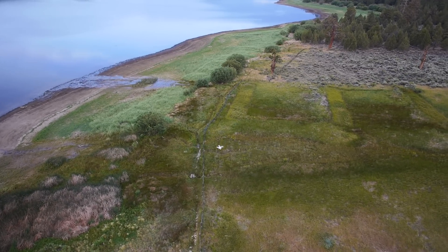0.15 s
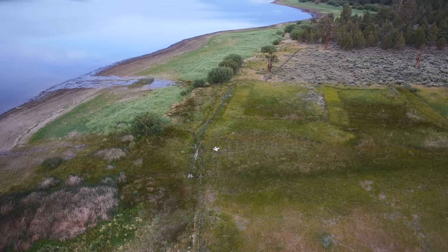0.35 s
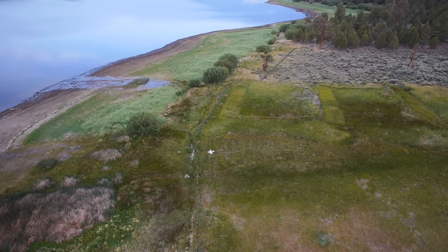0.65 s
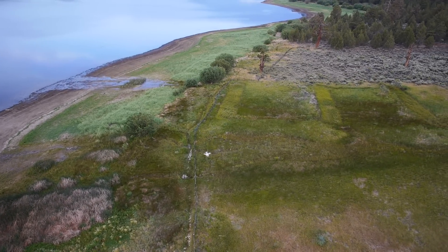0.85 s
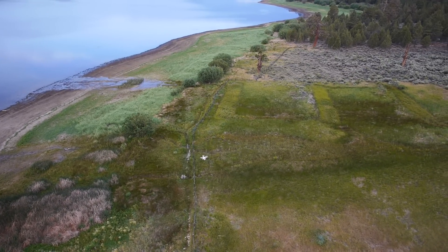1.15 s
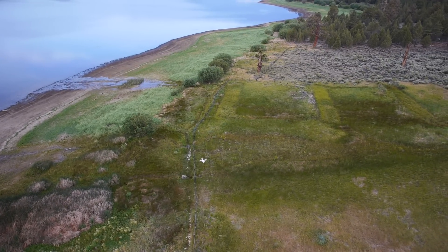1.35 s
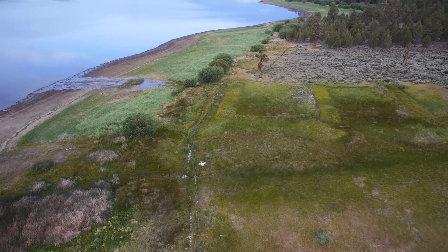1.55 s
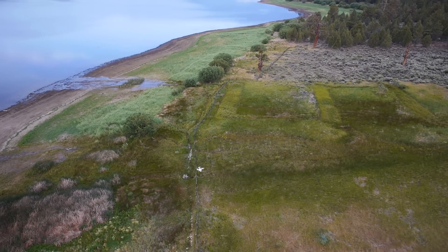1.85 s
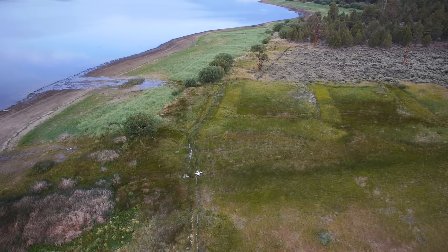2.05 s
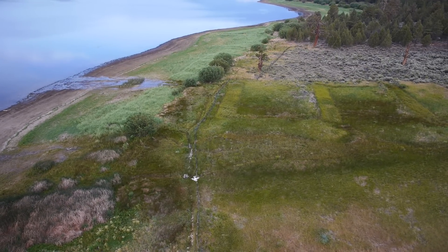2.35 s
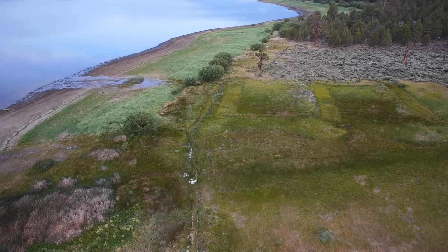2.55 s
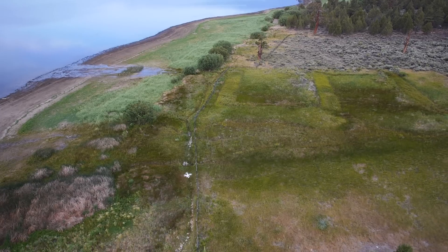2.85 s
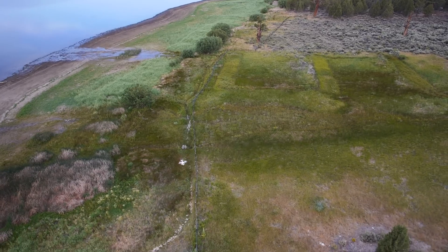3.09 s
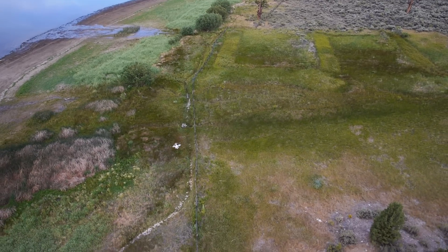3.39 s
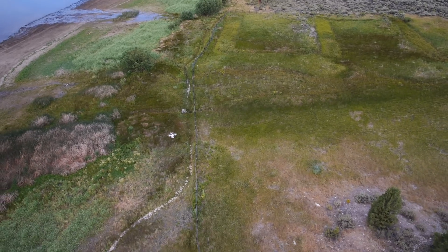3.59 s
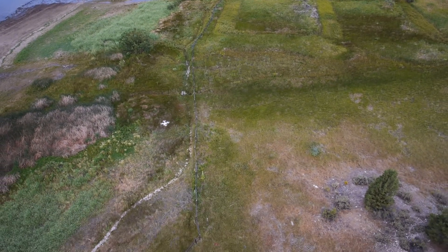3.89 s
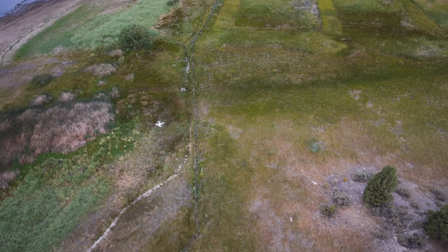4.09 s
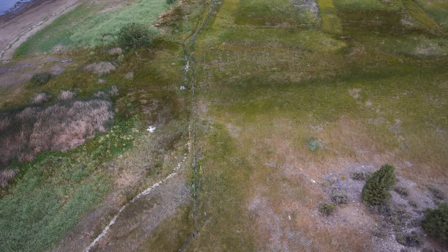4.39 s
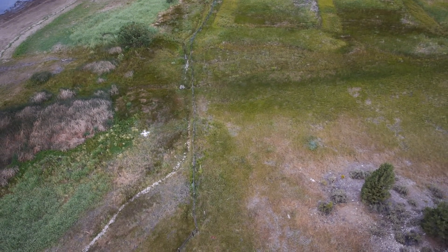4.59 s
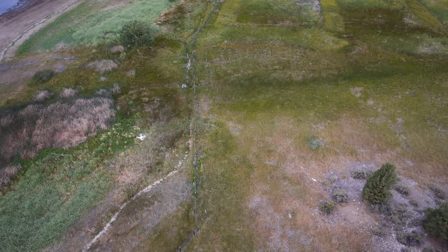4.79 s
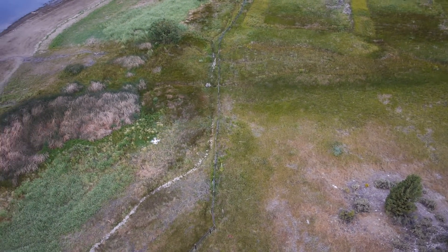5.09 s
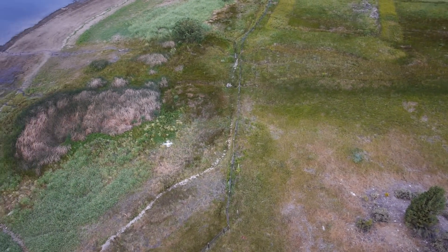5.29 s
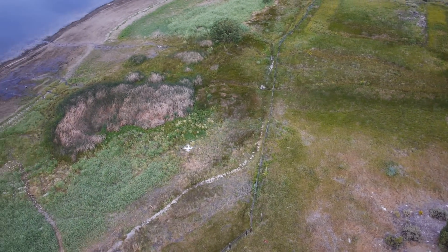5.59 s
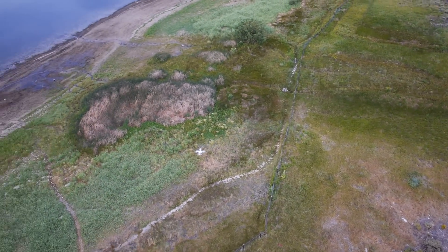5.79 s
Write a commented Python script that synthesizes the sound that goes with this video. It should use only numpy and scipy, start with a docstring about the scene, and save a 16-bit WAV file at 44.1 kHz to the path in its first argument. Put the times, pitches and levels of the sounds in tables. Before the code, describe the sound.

A multirotor drone flies outdoors, its propellers giving a steady buzzing hum that beats against itself, with airy hiss and a thin high motor whine.

```python
"""A buzzing blade hum that beats against itself: a multirotor drone in flight, heard from its own camera.
Two near propellers give each blade a thump, a slap and a spit of hiss; six far ones hum, duller.
All eight are two-bladed and drift in speed; a turn spreads the speeds apart briefly.
Behind them: a singing fourth order, shifting hiss bands, motor switching tones, rush of downwash."""
import sys
import numpy as np
from scipy import signal
from scipy.fft import rfft, irfft, next_fast_len
from scipy.io import wavfile
from scipy.ndimage import map_coordinates

SR = 44100
rng = np.random.default_rng(int(sys.argv[2]) if len(sys.argv) > 2 else 0)


def pcm_store(signal):
    """Save signal as 16-bit PCM."""
    levels = np.round(np.clip(np.atleast_2d(signal), -1, 1) * 32767)
    wavfile.write(sys.argv[1], SR, levels.astype(np.int16).T)


N = 261947

# near pair, blade rates before steering, one curve a propeller: [t/s, f/Hz]
NEAR_RATES = [
    [(0, 183.2), (.55, 181), (.75, 181.6), (.95, 185.8), (1.55, 184.4), (2.1, 187), (2.5, 189.8),
     (3.2, 190.5), (3.55, 189.4), (3.85, 189.7), (4.08, 188.3), (4.25, 190), (4.66, 189), (5.27, 187.9),
     (5.94, 186.8)],
    [(0, 190.2), (.35, 190.6), (.65, 192.2), (1.05, 188.6), (1.3, 191.3), (1.5, 190.4), (1.93, 192.7),
     (2.1, 189.2), (2.35, 189.2), (2.55, 190.5), (3.3, 190), (3.8, 188.4), (4.2, 190), (4.66, 187.4),
     (5.27, 187.2), (5.94, 187.2)],
]
# head start of each near propeller: [blades]
NEAR_LEAD_BLADES = (0, .58)
# three faster far propellers, blade rates before steering: [t/s, f/Hz]
FAST_RATES = [
    [(0, 201.3), (.55, 199.6), (1.2, 203.7), (1.5, 201), (1.85, 203), (2.2, 200.5), (2.52, 203.5),
     (2.85, 201.5), (3.45, 201), (4.05, 197.6), (4.66, 197.4), (5.27, 199)],
    [(0, 200), (2, 198.5), (3, 196.6), (3.6, 196.3), (3.95, 195), (4.66, 196.3), (5.27, 195.3), (5.94, 197)],
    [(0, 190), (.75, 191), (1.1, 193.2), (1.5, 192), (2.5, 194.6), (3.6, 191.3), (4.5, 190.3), (5.27, 192),
     (5.94, 191.3)],
]
# three slower far propellers, blade rates before steering: [t/s, f/Hz]
SLOW_RATES = [
    [(0, 182.3), (.8, 182), (1.1, 179.2), (1.3, 182.7), (1.85, 183), (2.2, 184.5), (2.45, 184),
     (3.05, 186.8), (4, 186), (4.3, 188), (4.66, 186.7)],
    [(0, 182.5), (.3, 183.7), (.7, 180), (1.1, 183), (2, 186), (2.5, 188.5), (3.1, 190), (3.9, 188.5),
     (4.66, 189.5), (5.27, 187)],
    [(0, 183.5), (.6, 183), (1.4, 184), (2, 186.3), (2.4, 189), (3, 190.3), (3.8, 188.8), (4.3, 189),
     (5.94, 187)],
]
# steering, a turn then its overshoot; speeds four propellers up, slows four: [t/s, blade rate shift/Hz]
STEERING = [(4.3, 0), (4.5, 6.5), (4.66, 9), (4.82, 7), (5.05, 2), (5.27, 0), (5.48, 2.8), (5.65, -1),
            (5.8, -3.8), (5.94, -3.3)]
# way of spin: steering speeds the propeller up (1) or slows it (-1)
NEAR_SPIN, FAST_SPIN, SLOW_SPIN = (1, -1), (1, -1, 1), (-1, -1, 1)
# motor hunting round the set speed: scale of lead or lag, random knots per second
NEAR_HUNT_BLADES, FAR_HUNT_BLADES, HUNT_KNOTS_PER_S = .008, .022, 7

# unsteadiness of the air entering the propellers: [t/s, level/dB]
TURBULENCE = [(0, 0.5), (1, 2.5), (2.3, 0.5), (3, 2.5), (3.8, 4), (4.3, 0.5), (4.7, 0), (5.2, 1),
              (5.94, -2)]
# gain on the near thump and the far propellers: [t/s, level/dB]
HUM = [(0, 1.5), (2.2, 1.9), (3.2, -0.5), (3.75, -4), (4.3, -3), (5.2, -1.5), (5.94, -0.5)]
# level of the blade slaps: [t/s, level/dB]
SLAP_LEVEL = [(0, -30.5), (1.3, -29.5), (2.3, -29.5), (2.65, -26.7), (3.4, -27.5), (3.9, -29), (4.3, -27.5),
              (4.6, -28.5), (5.05, -29.5), (5.28, -28.5), (5.94, -29.5)]
# level of the swish of the wake: [t/s, level/dB]
SWISH_LEVEL = [(0, -29), (.4, -27.8), (1.4, -29.5), (1.9, -28.3), (2.4, -31), (3, -35), (3.7, -39.5),
               (4.3, -40), (4.5, -34), (5.2, -34.5), (5.94, -32.5)]
# level of the tips' hiss: [t/s, level/dB]
HISS_LEVEL = [(0, -33), (2.5, -32.5), (3.3, -33), (4.2, -34), (4.6, -34), (5.94, -35.5)]
# level of the tips' finest fizz: [t/s, level/dB]
FIZZ_LEVEL = [(0, -42), (1.85, -43.5), (1.97, -41), (2.62, -41.5), (2.78, -42), (3.5, -39.5), (4.05, -39),
              (4.48, -37), (4.65, -41.5), (4.85, -38), (5.03, -43.5), (5.42, -39.5), (5.7, -41.5),
              (5.94, -42)]
# level of the singing fourth order: [t/s, level/dB]
TONE_LEVEL = [(0, -44), (2.1, -46), (2.5, -39.5), (3, -38.5), (3.5, -40.5), (3.85, -43), (4.12, -36),
              (4.35, -36), (4.6, -47), (4.95, -42), (5.25, -34), (5.55, -38.5), (5.94, -37.5)]
# bands of blade hiss: [centre f/Hz, width/Hz, level curve [t/s, level/dB]]
HISS_BANDS = [ (3800, 1100, [(0, -44), (2.2, -46), (2.7, -34), (3.7, -36), (4.3, -43), (4.6, -36.5),
              (5.94, -36.5)]), (10000, 970, [(0, -52), (3, -48), (3.7, -50), (4.9, -49), (5.25, -42),
              (5.94, -45)]), (11300, 1800, [(0, -57), (2.6, -44), (3.3, -48.5), (3.7, -40), (4.52, -44),
              (4.65, -54), (5.94, -52)])]

# spectrum of the near thump: [f/Hz, level/dB]
THUMP = [(60, -32.5), (130, 2), (190, 8.5), (260, 9.5), (380, 8), (570, 10), (760, 7.5), (950, 8),
         (1200, -9.5), (2000, -16), (9000, -56)]
# spectrum of the near slap: [f/Hz, level/dB]
SLAP = [(400, -26.5), (800, -5), (1100, -2.5), (1400, -2), (1750, 1.5), (2150, 4.5), (2600, 1.5),
        (3050, 2.5), (3450, 1.5), (3800, 3.5), (4180, 4.5), (4400, -4.5), (5100, -1.5), (5500, -2),
        (5750, -5), (6500, -10.5), (9000, -26), (15000, -45)]
# spectrum of the wake swish: [f/Hz, level/dB]
SWISH = [(60, -38), (200, -35), (400, -10.5), (800, -15), (1300, -1.5), (1800, -4.5), (2400, 1.5),
         (3050, 5), (3450, -8), (3750, -6), (4120, -0.5), (4400, -5), (4850, 0), (5500, -17.5), (6500, -22),
         (9000, -11), (15000, -41)]
# spectrum of the tip hiss: [f/Hz, level/dB]
HISS = [(1000, -21), (2500, 1.5), (4500, 11.5), (6000, 8), (7500, 2.5), (9500, -7), (12000, -34),
        (16000, -23)]
# spectrum of the tip fizz: [f/Hz, level/dB]
FIZZ = [(6000, -30), (8500, -9), (10300, -0.5), (12000, 0), (13000, -1.5), (14000, -4), (15700, -14)]
# spectrum of the faster far propellers: [f/Hz, level/dB]
HUM_FAST = [(90, -22.5), (200, 4.5), (400, -3.5), (600, -5), (800, 0.5), (1000, -0.5), (1300, 0.5),
            (2000, -0.5), (3000, -4), (4100, -8), (5000, -15.5), (9000, -26.5)]
# spectrum of the slower far propellers: [f/Hz, level/dB]
HUM_SLOW = [(90, -28.5), (185, 1), (370, 2.5), (550, 4), (740, 4), (950, 1), (1300, 1.5), (1700, -0.5),
            (3000, -2.5), (5000, -24), (9000, -34.5)]
# spectrum of the downwash: [f/Hz, level/dB]
AIR = [(20, -18), (60, -23), (110, -12.5), (170, -1), (300, 2), (600, 8), (2000, 8), (6000, -17),
       (15000, -26)]
# motor switching tones round SWITCH_HZ: [offset/multiples of blade rate, level/dB rms before wobble]
SIDEBANDS = [(-1, -63), (0, -62), (2, -61), (3, -63), (4, -57), (5, -58.5), (6, -56), (7, -58.5),
             (9, -57.5), (10, -57), (11, -61), (12, -62), (13, -63)]
SWITCH_HZ = 8041

# levels before the HUM gain: near thump, each far propeller
THUMP_DB, FAST_DB, SLOW_DB = -38.5, (-39.5, -46, -38.5), (-37.5, -40.5, -38.5)
# second near propeller relative to the first
SECOND_THUMP_DB, SECOND_SLAP_DB, SECOND_HISS_DB = -2.5, -4.5, -12
# difference between the two blades of a propeller, plus or minus, as a share of pulse size
THUMP_IMBALANCE, SLAP_IMBALANCE, FAR_IMBALANCE = 0.095, 0.081, 0.098
SWAY_BLADES = .0085  # timing shift of the slaps by eddies, before turbulence
TIP_WIDTH_PERIODS = .04  # Gaussian sigma of a tip's spit, in blade periods
# shell: extra delay of the treble, spacing of resonances, their delay ripple
SHELL_SPREAD_S, SHELL_SPACING_HZ, SHELL_LINGER_S = 0.00046, 1400, .0005
# brief level dip of all propeller sound; half width at 1/e of the depth in dB
DIP_S, DIP_WIDTH_S, DIP_DB = 4.5, 0.027, -2
# camera response: notch centres, half width, band limit
NOTCHES_HZ, NOTCH_HALF_WIDTH_HZ, TOP_HZ = (3980, 4640, 5530), 20, 15780


def amp(db):
    """Decibels to gain."""
    return 10 ** (np.asarray(db) / 20)


def unit(x):
    """Scale to rms 1."""
    return x / np.sqrt(np.mean(x ** 2) + 1e-20)


def curves(rows):
    """Interpolate each column after the time to one value per sample."""
    time_s, *columns = np.transpose(rows)
    return [np.interp(np.arange(N) / SR, time_s, column) for column in columns]


def gain_curve(rows):
    """Gain per sample from a [t/s, level/dB] table."""
    return amp(curves(rows)[0])


def wobble(knots_per_s):
    """Smooth random curve: a spline through normal random knots."""
    knots = rng.standard_normal(int(N * knots_per_s / SR) + 4)
    return map_coordinates(knots, [np.arange(N) * knots_per_s / SR])


def coloured(x, spectrum, size=4096):
    """Minimum-phase filter through the spectrum's points, output at rms 1."""
    hz, db = np.transpose(spectrum)
    log_bins = np.log(np.fft.rfftfreq(size, 1 / SR) + 1)
    gain = amp(np.interp(log_bins, np.log(hz), db))
    # folding the cepstrum onto positive time makes the filter causal
    cepstrum = irfft(np.log(gain))
    cepstrum[1:size // 2] *= 2
    cepstrum[size // 2 + 1:] = 0
    impulse_response = irfft(np.exp(rfft(cepstrum)))
    return unit(signal.fftconvolve(x - x.mean(), impulse_response)[:N])


def dispersed(x):
    """The shell smears a pulse: treble arrives later than bass, and resonances linger."""
    m = next_fast_len(N + SR // 2)
    hz = np.fft.rfftfreq(m, 1 / SR)
    delay_s = SHELL_SPREAD_S * np.tanh(hz / 3500)
    delay_s = delay_s + SHELL_LINGER_S * np.cos(2 * np.pi * hz / SHELL_SPACING_HZ)
    # phase is the integral of group delay over frequency
    phase = 2 * np.pi * np.cumsum(delay_s) * hz[1]
    return irfft(rfft(x, m) * np.exp(-1j * phase), m)[:N]


def resonance(x, centre_hz, width_hz):
    """One resonance applied twice for steep flanks, output at rms 1."""
    b, a = signal.iirpeak(min(centre_hz, .45 * SR), centre_hz / width_hz, SR)
    once = signal.lfilter(b, a, x)
    return unit(signal.lfilter(b, a, once))


def blade_count(rates, spin, lead_blades, hunt_blades):
    """Blades gone by at each sample: own rate plus or minus steering, integrated, with hunting."""
    rate_hz = curves(rates)[0] + spin * curves(STEERING)[0]
    return np.cumsum(rate_hz) / SR + lead_blades + hunt_blades * wobble(HUNT_KNOTS_PER_S)


def slaps(passes, stir, scatter_db, jitter_s, imbalance):
    """One suction pulse a blade; the two blades differ, eddies scatter size and timing."""
    blade = np.arange(1, int(passes[-1]))
    at = np.interp(blade, passes, np.arange(N))
    size_chance, time_chance = rng.standard_normal((len(blade), 2)).T * stir[at.astype(int)]
    size = amp(scatter_db * size_chance) * (1 + imbalance * (-1) ** blade)
    at = np.clip(at + jitter_s * SR * time_chance, 0, N - 2)
    # split each pulse over two samples to keep its fractional time
    whole, part = at.astype(int), at % 1
    first = np.bincount(whole, size * (1 - part), N)
    second = np.bincount(whole + 1, size * part, N)
    return -first - second


def spits(passes, early, width, between):
    """Noise flaring as each blade sweeps by; early and width in blade periods, between a gain floor."""
    offset = (passes + early + .5) % 1 - .5
    flare = np.exp(-.5 * (offset / width) ** 2)
    return (flare + between) * rng.standard_normal(N)


def near_thump(pair, stir):
    """Soft low pressure pulse of each blade, wandering in time and level with turbulence."""
    total = np.zeros(N)
    beats = [passes + .09 + .02 * stir * wobble(12) for passes in pair]
    for passes, db in zip(beats, (0, SECOND_THUMP_DB)):
        pulses = slaps(passes, stir, scatter_db=0.48, jitter_s=.000015, imbalance=THUMP_IMBALANCE)
        total += pulses * amp(db + 1.3 * stir * wobble(14))
    return coloured(total, THUMP)


def near_slap(pair, stir):
    """Sharp pulse of each blade; eddies lasting several blades widen the high harmonics."""
    total = np.zeros(N)
    swayed = [passes + SWAY_BLADES * np.sqrt(stir) * wobble(55) for passes in pair]
    for passes, db in zip(swayed, (0, SECOND_SLAP_DB)):
        pulses = slaps(passes, stir, scatter_db=0.5, jitter_s=.00001, imbalance=SLAP_IMBALANCE)
        total += pulses * amp(db + 1.55 * stir * wobble(40))
    return coloured(dispersed(total), SLAP)


def wake_swish(pair):
    """Wake noise that flares just after each blade."""
    flares = sum(spits(passes, early=-0.031, width=0.081, between=0.4) for passes in pair)
    return coloured(flares * amp(1.2 * wobble(11)), SWISH)


def tip_noise(pair):
    """Unfiltered noise of the blade tips, a short spit just ahead of each slap."""
    total = np.zeros(N)
    for passes, db in zip(pair, (0, SECOND_HISS_DB)):
        spit = spits(passes, early=0.052, width=TIP_WIDTH_PERIODS, between=0.2)
        total += spit * amp(db + 1.3 * wobble(70) + 0.22 * wobble(8))
    return total


def near_propellers(pair, stir, hum):
    """Each blade's loading pulse, wake and tip add up: thump, slap, swish, hiss and fizz."""
    tips = tip_noise(pair)
    return (amp(THUMP_DB) * hum * near_thump(pair, stir)
            - gain_curve(SLAP_LEVEL) * near_slap(pair, stir)
            + gain_curve(SWISH_LEVEL) * wake_swish(pair)
            + gain_curve(HISS_LEVEL) * coloured(tips, HISS)
            + gain_curve(FIZZ_LEVEL) * coloured(tips, FIZZ))


def singing_tone(passes, stir):
    """Sine at four times the blade rate of one propeller; flutters more in rough air."""
    flutter = amp(1.6 * stir ** 2 * wobble(16))
    phase = 2 * np.pi * 4 * passes + .3 * stir * wobble(16)
    return gain_curve(TONE_LEVEL) * unit(flutter * np.sin(phase))


def hiss_bands(passes):
    """Resonant bands of blade hiss swell and fade, so its colour shifts."""
    total = np.zeros(N)
    for centre_hz, width_hz, level in HISS_BANDS:
        noise = spits(passes, early=0.016, width=0.06, between=0.18)
        total += gain_curve(level) * resonance(noise, centre_hz, width_hz)
    return total


def far_propellers(rate_curves, spins, levels_db, spectrum, stir):
    """The hull shades a far group, leaving mostly low orders; unequal blades add shaft tones halfway."""
    total = np.zeros(N)
    for rates, spin, db in zip(rate_curves, spins, levels_db):
        passes = blade_count(rates, spin, rng.random(), FAR_HUNT_BLADES)
        passes = passes + 0.0091 * stir * wobble(30)
        pulses = slaps(passes, stir, scatter_db=0.12, jitter_s=.000012, imbalance=FAR_IMBALANCE)
        unsteady = pulses * amp(2.43 * stir * wobble(14))
        total += amp(db) * coloured(unsteady, spectrum)
    return total


def motor_whine(passes):
    """The speed controller chops the current at a fixed rate; turning magnets add sidebands."""
    chop_cycles = SWITCH_HZ * np.arange(N) / SR
    tones = np.zeros(N)
    for order, db in SIDEBANDS:
        cycles = chop_cycles + order * passes + rng.random()
        tones += amp(db) * np.sqrt(2) * np.sin(2 * np.pi * cycles)
    return tones * amp(1.5 * wobble(8))


def airflow(stir):
    """Rush of the downwash round the camera: filtered noise that follows turbulence."""
    level = amp(-46.5 + 2.3 * wobble(8.1)) * stir ** 0.67
    return level * coloured(rng.standard_normal(N), AIR)


def scene():
    """Eight propellers hold their own speeds and follow one steering command in the same stirred air."""
    stir, hum = gain_curve(TURBULENCE), gain_curve(HUM)
    pair = [blade_count(rates, spin, lead, NEAR_HUNT_BLADES)
            for rates, spin, lead in zip(NEAR_RATES, NEAR_SPIN, NEAR_LEAD_BLADES)]
    near = near_propellers(pair, stir, hum)
    near = near + singing_tone(pair[0], stir) + hiss_bands(pair[0])
    fast = far_propellers(FAST_RATES, FAST_SPIN, FAST_DB, HUM_FAST, stir)
    slow = far_propellers(SLOW_RATES, SLOW_SPIN, SLOW_DB, HUM_SLOW, stir)
    propellers = near + hum * (fast + slow)
    time_s = np.arange(N) / SR
    dip = amp(DIP_DB * np.exp(-((time_s - DIP_S) / DIP_WIDTH_S) ** 2))
    return (dip * propellers + motor_whine(pair[0]) + airflow(stir))[None]


def record(dry):
    """The camera notches out three narrow bands and keeps nothing above its band limit."""
    m = next_fast_len(N + SR // 2)
    hz = np.fft.rfftfreq(m, 1 / SR)
    notches = np.prod([(hz - c) / (hz - c - 1j * NOTCH_HALF_WIDTH_HZ) for c in NOTCHES_HZ], axis=0)
    return irfft(rfft(dry, m) * notches * (hz < TOP_HZ), m)[..., :N]


dry = scene()
out = record(dry)
pcm_store(out)
```